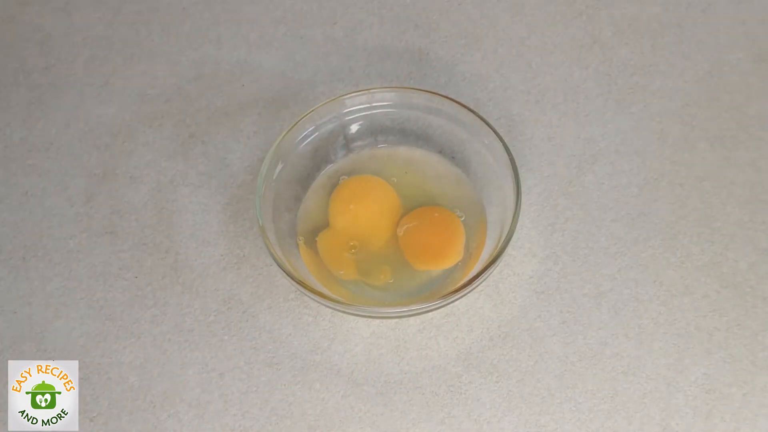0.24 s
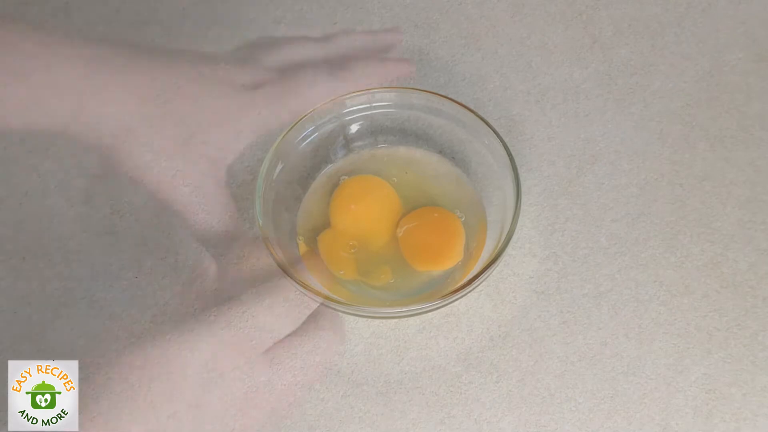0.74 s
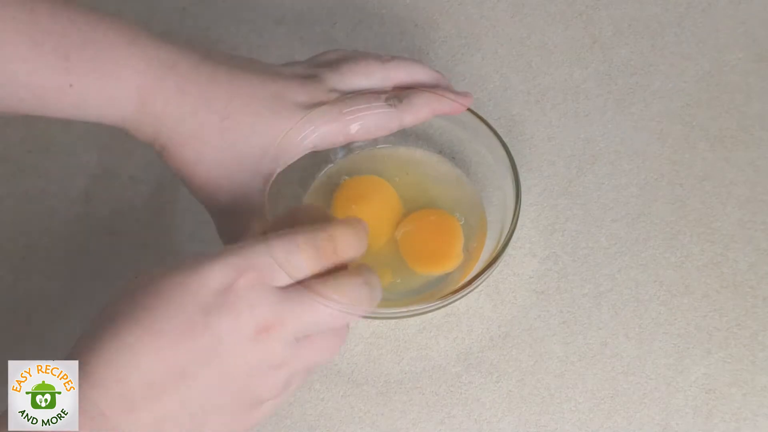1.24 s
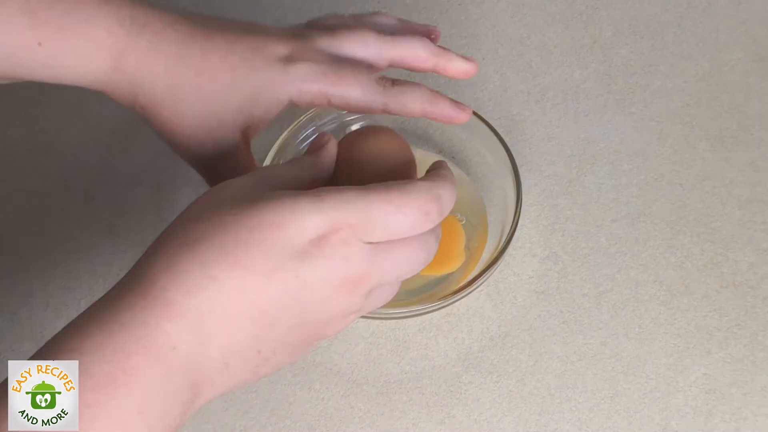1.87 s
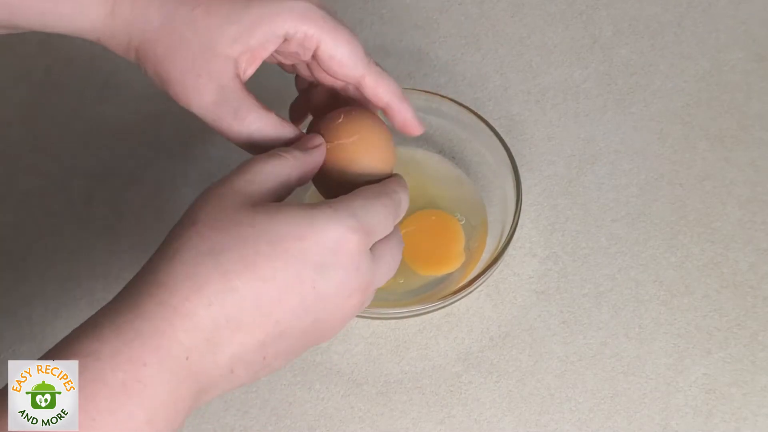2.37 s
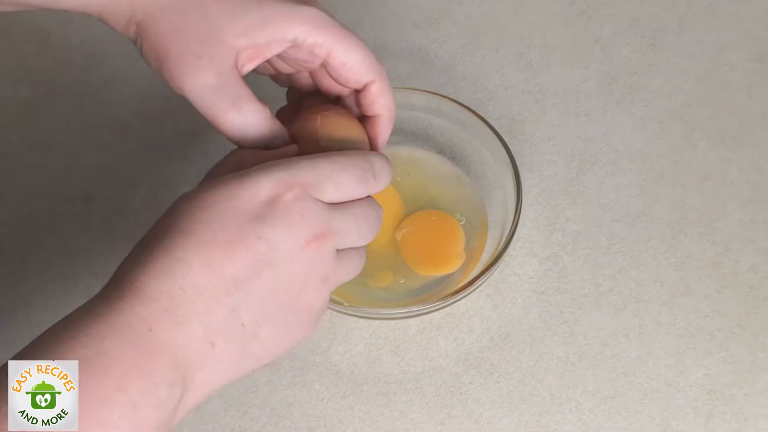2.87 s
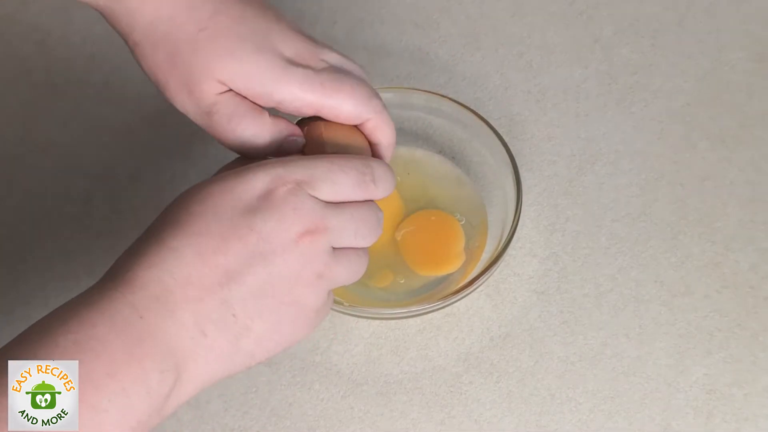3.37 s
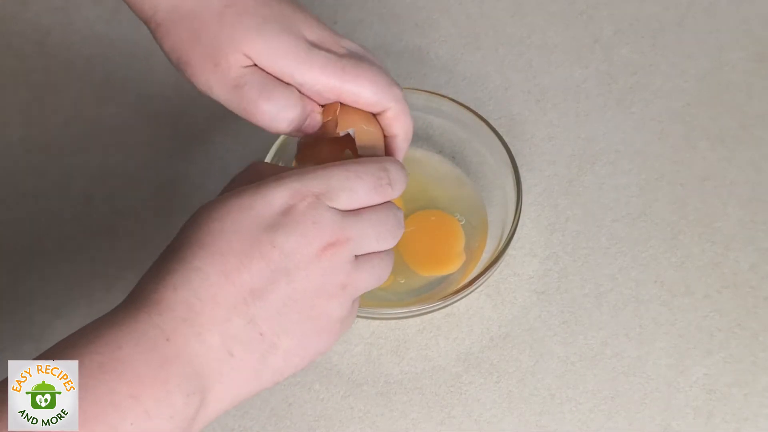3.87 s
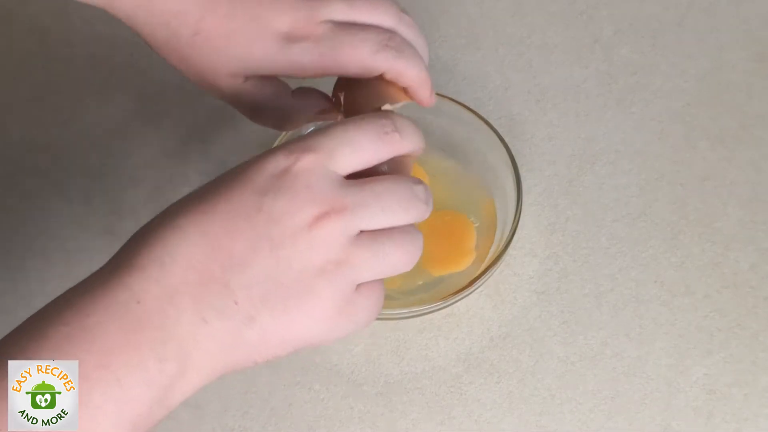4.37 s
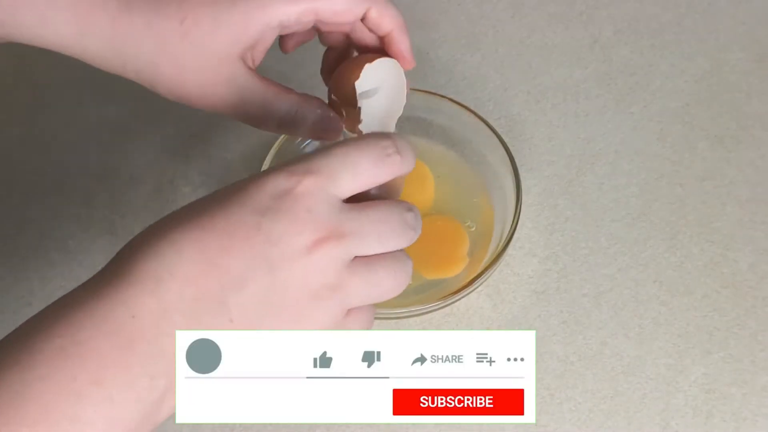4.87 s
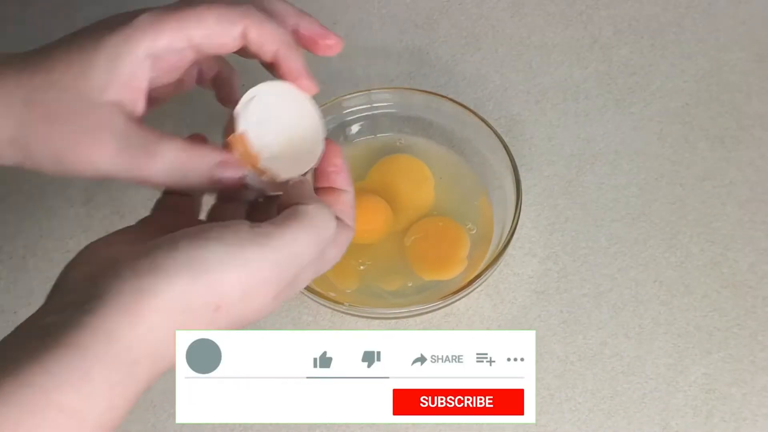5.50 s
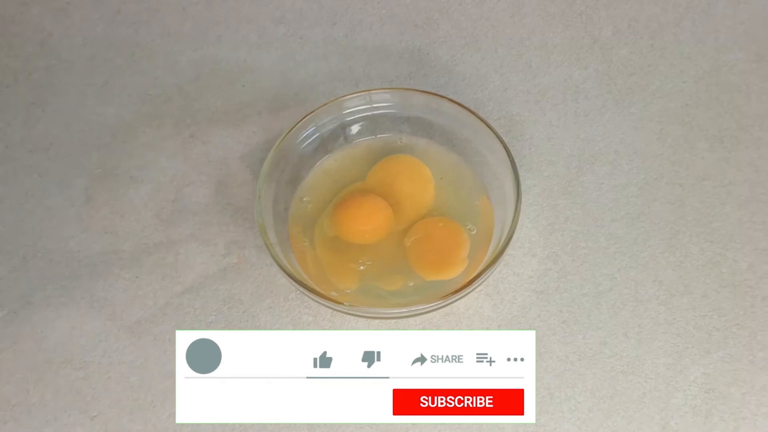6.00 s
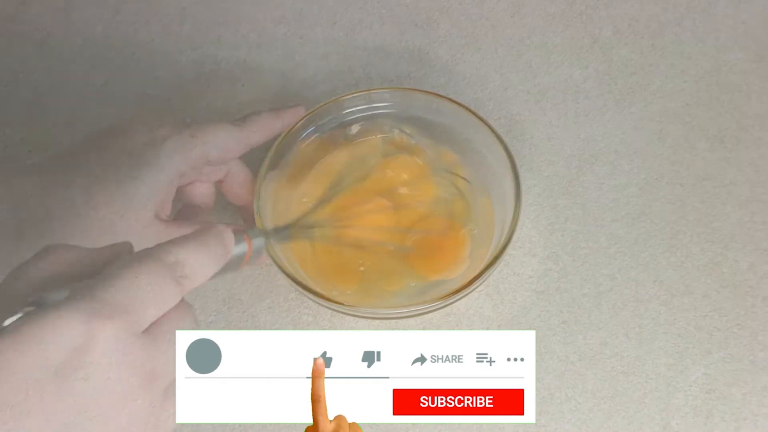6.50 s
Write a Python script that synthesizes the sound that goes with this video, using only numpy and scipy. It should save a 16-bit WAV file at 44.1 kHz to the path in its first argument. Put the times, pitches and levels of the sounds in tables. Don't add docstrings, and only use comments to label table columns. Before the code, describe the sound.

An egg is tapped four times on a glass bowl's rim, the shell cracks apart, and a wire whisk begins clinking faintly in a kitchen.

```python
import sys
import numpy as np
from scipy import signal
from scipy.fft import rfft, irfft, next_fast_len
from scipy.io import wavfile
from scipy.ndimage import uniform_filter1d

SR = 44100
rng = np.random.default_rng(int(sys.argv[2]) if len(sys.argv) > 2 else 0)


def gain_from_db(level_db):
    decades = np.asarray(level_db, float) / 20
    return 10 ** decades


def store_wav(level_fs):
    pcm = np.round(np.clip(np.atleast_2d(level_fs), -1, 1) * 32767)
    wavfile.write(sys.argv[1], SR, pcm.T.astype(np.int16))


N = 297234
SIZE = next_fast_len(N)

# [start_s, crack_db, thump_db, knock_db, contact_ms]
TAPS = [
    (1.0292, -22.5, -34, -33, 0.15),
    (1.3675, -13, -28.5, -11, 0.044),
    (1.5375, -15, -33, -47.5, 0.021),
    (1.707, -19.5, -32, -82.5, 0.0075),
]
# [low_pair_db, middle_pair_db, high_pair_db, top_modes_db, clack_db]
RIM_BLOWS = [(-58.5, -36, -63.5, -69.5, -28), (-42.5, -27, -31.5, -36, -28), (-46, -23, -34.5, -40, -37),
             (-44, -32.5, -29, -39, -36)]
# [pitch_hz, level_db, t60_s]
BOWL_MODES = [
    [(2075, 4, 0.11), (2100, -10, 0.4)],
    [(3753, -2.5, 0.079), (3910, -18, 0.16)],
    [(5760, -10, 0.045), (5856, -3.5, 0.08), (6010, -4, 0.021)],
    [(4970, 0.5, .04), (7300, -8.5, 0.019), (8405, -8.5, 0.031)],
]
# [pitch_hz, level_db, t60_s]
EGG_MODES = [(760, -14.5, 0.0086), (913.4, -9.5, 0.031), (1250, 1.5, 0.023), (1500, -1, 0.0074),
             (1990, -0.5, 0.014), (2400, -15, 0.0033)]
# [pitch_hz, level_db, t60_s]
COUNTER_MODES = [(67, -5, .2), (98.46, -4, 0.79), (123.2, 1.5, .15), (227, -20, 0.097), (283, -13.5, 0.18),
                 (318.6, -14.5, 0.9), (470, -4.5, .08)]


def taps():
    close, body = np.zeros((2, N)), np.zeros((2, N))
    for (start_s, crack_db, thump_db, knock_db, contact_ms), blow in zip(TAPS, RIM_BLOWS):
        glass = sum(gain_from_db(db) * ring(modes, rise_s=0.00076) for db, modes in zip(blow, BOWL_MODES))
        add(body, start_s, gain_from_db(2.5) * glass, 1.5)
        egg = gain_from_db(knock_db) * ring(EGG_MODES, rise_s=0.0025)
        add(body, start_s, gain_from_db(-4.5) * egg, 3.0)

        push = np.arange(256) / (max(contact_ms, 0.01) * SR / 1000)
        push = push * np.exp(-push)
        crack = np.convolve(chip(), push / np.sqrt(np.sum(push ** 2)))[:1024]
        clack = band(burst(0.06), 300, 2700)
        rock = np.hanning(280) * np.sin(2 * np.pi * np.arange(280) / 280)
        hard = glass + egg
        hard[:1024] += gain_from_db(crack_db + 13.5) * band(crack, 830, 17000)
        hard[:1024] += gain_from_db(blow[-1]) * clack
        hard[:280] += gain_from_db(thump_db - 5.5) * rock
        add(close, start_s, hard, 2.0)

        thump = ring(COUNTER_MODES, rise_s=0.004) * suppressor(SR // 2, -11.5)
        add(body, start_s, gain_from_db(thump_db) * thump, 2.5)
    return close, body


def chip(size=64):
    x, k = 0.13 * burst(0.004), np.arange(size)
    x[:size] += np.cos(np.pi * (size - k) ** 2 / (2 * size)) / np.sqrt(size / 2)
    return x


# [start_s, snap_db, pitch_hz, splinter_db]
CRACKS = [(2.1614, -66, 2100, 10), (2.449, -68, 1880, 12.5), (2.6332, -51.5, 6900, 7),
          (2.9786, -59, 2470, 10), (3.0578, -57.5, 1230, -1), (3.2101, -53, 1770, -6.5),
          (3.383, -50.5, 6200, 7), (3.5224, -42.5, 4100, -4), (3.72, -50.5, 2880, 7.5),
          (3.809, -42.5, 4020, 3.5), (3.817, -38.5, 3600, -1), (3.8452, -17, 2570, -11),
          (3.8655, -20.5, 2220, 6), (3.875, -29, 1980, 5), (3.8915, -23, 2920, -10), (3.97, -35, 2400, -2),
          (4.028, -50.5, 3800, 11), (4.0672, -41.5, 1790, 13.5), (4.104, -46, 7800, 11),
          (4.118, -41.5, 7400, 7), (4.1446, -33.5, 2300, -4), (4.1732, -38.5, 3400, -3),
          (4.224, -62.5, 2120, 20), (4.371, -41.5, 6400, -1.5)]


def prising():
    return snaps(CRACKS, 2570, ring_s=0.0063, pan_db=5.5)


# [start_s, snap_db, pitch_hz, splinter_db]
HALVES = [(4.5443, -58, 3080, 0), (4.5954, -60, 2270, 14), (4.6018, -44.5, 2420, 12),
          (4.6288, -45, 2680, 12), (4.6634, -15, 5710, 1.5), (4.6784, -22.5, 5400, -22.5),
          (4.9488, -59.5, 2290, -9), (5.2637, -59.5, 2228, -1.5), (5.448, -31.5, 2338, -5.5),
          (5.505, -43.5, 5200, 4), (5.558, -58, 7800, 15.5), (5.7453, -55, 2250, -3),
          (5.7753, -54, 2381, -1), (5.989, -63.5, 1810, -10)]


def halves():
    return snaps(HALVES, 3330, ring_s=0.012, pan_db=5.0)


# [start_s, snap_db, pitch_hz, splinter_db]
TOUCHES = [
    (0.163, -63, 2100, 6.5),
    (0.339, -53, 2280, 0),
    (0.524, -54.5, 5360, 3),
    (0.573, -61.5, 5030, 9),
    (0.61, -72, 7300, 10),
    (0.641, -49.5, 1500, 0),
]


def touches():
    return snaps(TOUCHES, 2000, ring_s=0.0045, pan_db=4.5)


# [start_s, level_db, pitch_hz, tick_db]
CLINKS = [(6.4727, -63, 2310, 2), (6.5135, -52.5, 1570, 14), (6.521, -54.5, 2580, 10),
          (6.5937, -52.5, 1500, -12), (6.6097, -39, 4500, -14.5), (6.6123, -30, 5620, -2),
          (6.6255, -40, 6160, -1), (6.661, -54, 1630, -0.5), (6.7, -57, 2780, -4), (6.636, -45, 3030, 8),
          (6.6504, -46, 6400, 10.5), (6.6838, -36.5, 3990, -4.5)]


def whisk():
    return snaps(CLINKS, 4000, ring_s=0.013, pan_db=6.0)


def snaps(table, hiss_lo_hz, ring_s, pan_db):
    out = np.zeros((2, N))
    for start_s, db, hz, splinter_db in table:
        t60 = ring_s * min(3200 / hz, 1) * gain_from_db(0.05 * (db + 51))
        piece = [(hz, -1, t60), (0.876 * hz, -8, 0.44 * t60), (1.08 * hz, -8, 0.81 * t60), (1.7 * hz, -17, t60 / 2)]
        short_rings = [(2600, -14, 0.004), (7500, -13, 0.004)]
        x = 2 * ring(piece + short_rings, rise_s=0.00051, size=2048)
        x[30:1054] += gain_from_db(splinter_db + 13.5) * band(chip(), hiss_lo_hz, 11000)
        add(out, start_s + 0.00089, gain_from_db(db) * x, pan_db)
    return out


# [start_s, level_db, pitch_hz, t60_s, pitch_rise_per_s]
SLOP = [
    (3.872, -59, 200, 0.73, 0.43),
    (3.901, -62, 274, 0.45, 0),
    (4.074, -61, 1130, 0.9, 1.5),
    (6.518, -63, 1500, 0.31, 0.49),
    (6.647, -55.5, 550, 0.18, 0.3),
    (6.63, -62, 190, 0.27, 0),
    (6.52, -65, 270, 0.18, 0.84),
    (6.62, -59.5, 100.7, 0.37, 0.82),
    (6.655, -59.5, 1540, 0.09, 0.55),
]


def slop():
    out, t = np.zeros((2, N)), np.arange(SR // 6) / SR
    for start_s, db, hz, t60, rise in SLOP:
        phase = 2 * np.pi * np.cumsum(hz * (1 + rise * t)) / SR
        fade = np.exp(-np.log(1000) * t / t60)
        shape = np.minimum(t / 0.0054, 1) * fade * np.minimum((t[-1] - t) / 0.011, 1)
        gurgle = 1.06 + 0.68 * walk(hz / 4.5)[:len(t)]
        add(out, start_s, gain_from_db(db) * shape * gurgle * np.sin(phase), 2.0)
    return out


# [peak_s, length_s, hollow_rub_db, dry_hiss_db, hollow_pitch_hz]
STROKES = [(0.193, 0.097, -68, -75, 1920), (0.361, 0.085, -74.5, -66, 1920), (0.689, .16, -58, -66, 1663),
           (0.907, 0.19, -98, -75, 1840), (2.641, 0.38, -82, -75, 1905), (3.412, 0.051, -91, -63.5, 1900),
           (3.54, 0.051, -62.5, -72, 4000), (3.983, 0.068, -47, -61, 1920), (4.137, 0.13, -57.5, -68, 1510),
           (5.518, 0.096, -85, -67, 2146), (5.847, 0.9, -75, -77.5, 2150), (6.03, 0.15, -70, -82, 1880),
           (6.477, 0.052, -81, -72, 2100), (6.542, 0.098, -64, -63, 2570), (6.665, 0.049, -61, -57, 2500)]


def rubbing():
    fade_db, rise_share = -17.5, 0.99
    t, out = np.arange(N) / SR, np.zeros((2, N))
    slips = rng.standard_normal((2, N)) * gain_from_db(1.0 * rng.exponential(size=N) + 2.0 * walk(35))
    hiss = unit(band(slips, 6600, 8200) + 0.5 * band(slips, 5200, 6300))
    for peak_s, length_s, rub_db, hiss_db, hz in STROKES:
        away = np.maximum(t - peak_s, (peak_s - t) / rise_share) / max(length_s, 0.01)
        now = away < 3
        hollow = unit(band(slips[:, now], hz / 1.13, hz * 1.2))
        stroke = gain_from_db(rub_db) * hollow + gain_from_db(hiss_db) * hiss[:, now]
        out[:, now] += gain_from_db(fade_db * away[now]) * stroke
    return out


# [band_hz, level_db, t60_s]
ROOM = [(60, 3.5, 0.64), (240, 7, 0.83), (764, 1, 0.79), (2000, -0.5, 0.71), (4500, -4.5, 0.71),
        (7400, 2.5, 0.47), (11000, -1, 0.5), (15000, -2, 0.49)]
# [delay_s, left_db, right_db]
WALLS = [(.0022, 13.5, 20.5), (.0045, 13, 14.5), (.0075, 16, 9.5), (0.0103, 24, 12.5), (.021, 8, 9.5),
         (.028, 16, 2.5)]


def kitchen(size=SR):
    t, out = np.arange(size) / SR, 0
    grain = gain_from_db(5.2 * rng.exponential(size=size) * np.exp(-t / 0.019))
    noise = port_noise(grain, lag=0)
    for hz, part in half_octaves(size):
        fade = np.exp(-np.log(1000) * t / max(on_log(hz, ROOM, 2), 0.05))
        out = out + gain_from_db(on_log(hz, ROOM, 1)) * irfft(noise * part, size) * fade
    onset = np.clip((t - 0.0015) / 0.00059, 0, 1)
    out = out * onset * gain_from_db(3.0 * np.exp(-t / 0.0034))
    for delay_s, left_db, right_db in WALLS:
        out[:, int(delay_s * SR)] += gain_from_db(np.array([left_db, right_db]))
    return out


# [band_hz, level_db_per_hz]
HUM = [(12, -33.5), (20, -7), (106, -8), (148, -10), (302, -8), (431, -19), (745, -21), (928, -19.5),
       (1040, -22.5), (1950, -23), (4190, -29), (7250, -33), (10100, -42), (12900, -41), (14000, -45.5)]


def hum():
    hz = np.fft.rfftfreq(SIZE, 1 / SR)
    spectrum = gain_from_db(on_log(hz, HUM, 1)) * port_noise(np.ones(SIZE), lag=27)
    out = 0
    for _, part in half_octaves(SIZE):
        flicker = gain_from_db(0.24 * walk(4.6))
        out = out + flicker * irfft(spectrum * part, SIZE)[:, :N]
    return gain_from_db(-64.5) * unit(out)


# [band_hz, share_0_to_1]
LIKENESS = [(60, 1), (150, 0.2), (300, 1), (700, 0.6), (3000, 0), (12000, 0.05)]


def port_noise(grain, lag):
    hz = np.fft.rfftfreq(len(grain), 1 / SR)
    share = np.clip(on_log(hz, LIKENESS, 1), 0, 1)
    common, *own = rfft(grain * rng.standard_normal((3, len(grain))))
    late = np.array([np.ones(len(hz)), np.exp(-2j * np.pi * hz * lag / SR)])
    return np.sqrt(share) * common * late + np.sqrt(1 - share) * np.array(own)


# [band_hz, gain_db]
MIC = [(30, -26.5), (60, -2.5), (100, 2), (2200, 1.5), (3200, -4.5), (4000, -6.5), (4800, -4), (6000, -2.5),
       (6700, -8), (7400, 3), (8600, -11), (10000, -9.5), (12000, -25), (15000, -25.5)]


def microphone(x):
    gain = gain_from_db(on_log(np.fft.rfftfreq(SIZE, 1 / SR), MIC, 1))
    return irfft(rfft(x, SIZE) * gain, SIZE)[:, :N]


def suppressor(size, duck_db):
    hold_s, let_go_s = 0.157, 0.008
    t = np.arange(size) / SR
    return gain_from_db(duck_db / (1 + np.exp(np.clip((hold_s - t) / let_go_s, -50, 50))))


def ring(modes, rise_s, size=SR // 2):
    t, out = np.arange(size) / SR, 0
    swell = 1 - np.exp(-(t / max(rise_s, 1e-4)) ** 2)
    for k, (hz, db, t60) in enumerate(modes):
        fade = np.exp(-np.log(1000) * t / max(t60, 1e-3))
        out = out + (-1) ** k * gain_from_db(db) * np.sin(2 * np.pi * hz * t) * fade
    return swell * out


def burst(t60, size=1024):
    return rng.standard_normal(size) * np.exp(-np.log(1000) * np.arange(size) / SR / max(t60, 1e-3))


def walk(rate):
    k = int(SR / rate)
    steps = np.repeat(rng.standard_normal(N // k + 1), k)
    return 1.7 * uniform_filter1d(uniform_filter1d(steps, k), k)[:N]


def half_octaves(size):
    octave = np.log2(np.maximum(np.fft.rfftfreq(size, 1 / SR), 1))
    return [(2 ** c, np.clip(1 - 2 * np.abs(octave - c), 0, 1)) for c in np.arange(4, 15, 0.5)]


def on_log(hz, table, column):
    table = np.array(table)
    return np.interp(np.log(np.maximum(hz, 1)), np.log(table[:, 0]), table[:, column])


def band(x, lo_hz, hi_hz):
    sos = signal.butter(2, [lo_hz, min(hi_hz, 0.45 * SR)], "bandpass", fs=SR, output="sos")
    return signal.sosfilt(sos, x)


def unit(x):
    return x / np.sqrt(np.mean(x ** 2))


def add(out, start_s, x, pan_db):
    i = int(start_s * SR)
    x = x[:N - i]
    out[:, i:i + len(x)] += x * gain_from_db(np.array([[pan_db], [-pan_db]]) / 2)


def scene():
    close, body = taps()
    shell = touches() + prising() + halves()
    wires = whisk()
    near = gain_from_db(1.5) * close + body + shell + wires + slop()

    room = kitchen()
    tap_send = gain_from_db(-25.0) * close
    snap_send = gain_from_db(-32.0) * shell + gain_from_db(-32.5) * wires
    for send, duck_db in ((tap_send, -7), (snap_send, -4)):
        mono = send.mean(axis=0, keepdims=True)
        near += signal.fftconvolve(mono, room * suppressor(SR, duck_db), axes=1)[:, :N]
    return microphone(near) + rubbing() + hum()


def roll_off(x):
    return signal.sosfilt(signal.butter(12, 15730, fs=SR, output="sos"), x)


def record(dry):
    ceiling = 0.8
    mix = ceiling * np.tanh(dry / ceiling)
    mix = signal.sosfilt(signal.butter(6, 15700, fs=SR, output="sos"), mix)
    return roll_off(mix)


dry = scene()
out = record(dry)
store_wav(out)
```